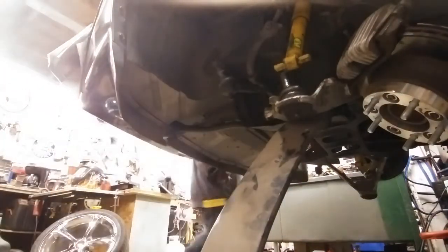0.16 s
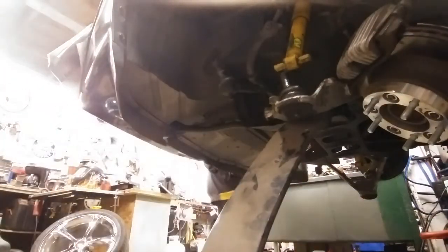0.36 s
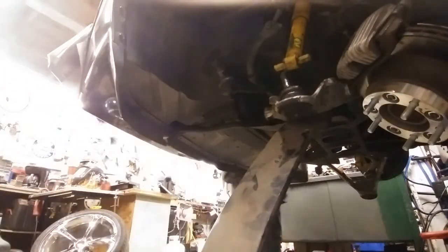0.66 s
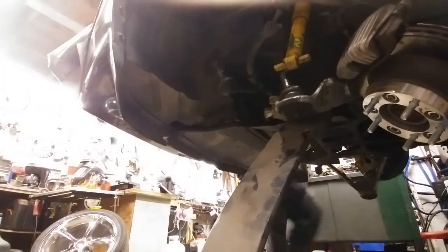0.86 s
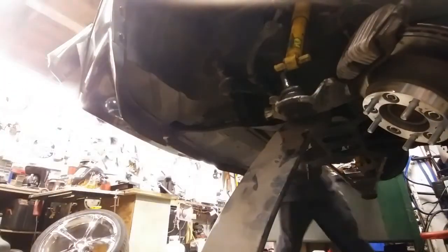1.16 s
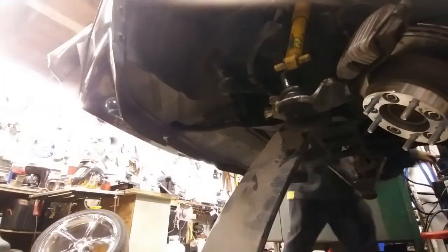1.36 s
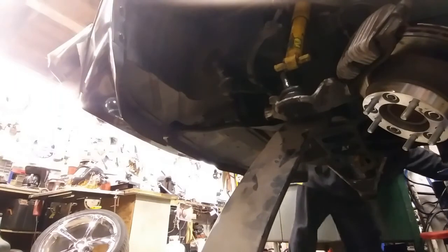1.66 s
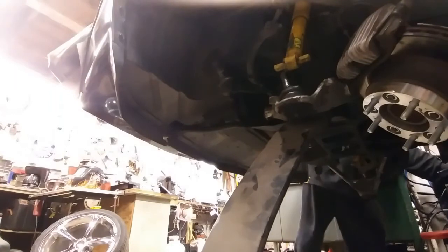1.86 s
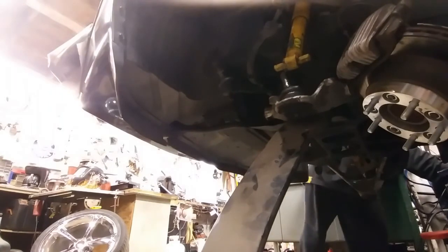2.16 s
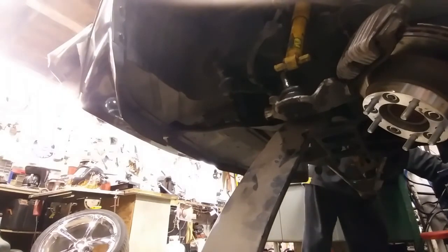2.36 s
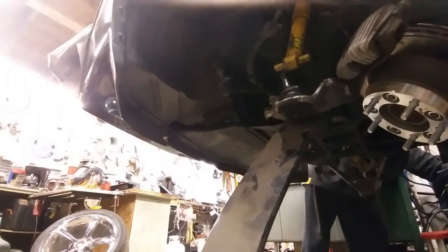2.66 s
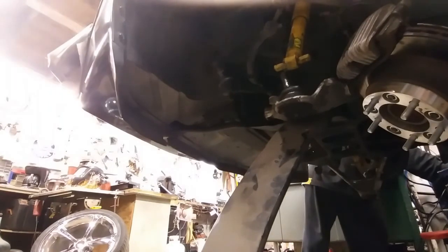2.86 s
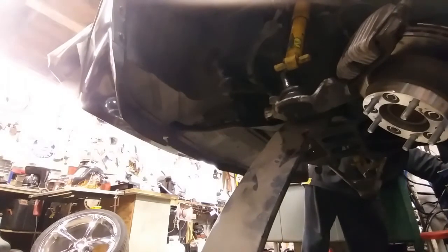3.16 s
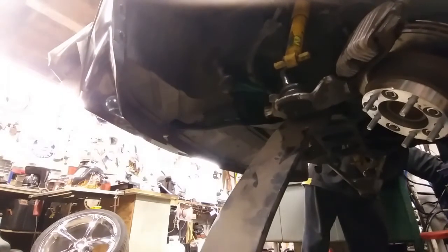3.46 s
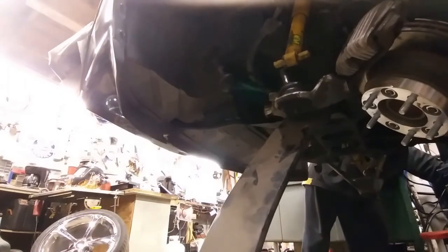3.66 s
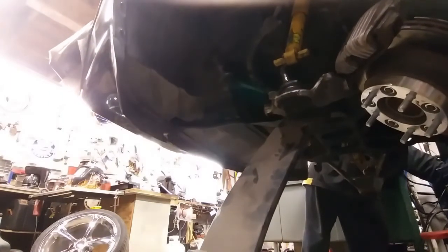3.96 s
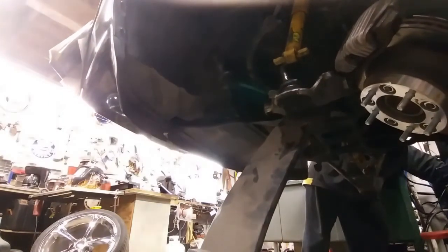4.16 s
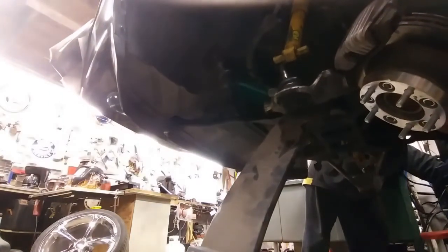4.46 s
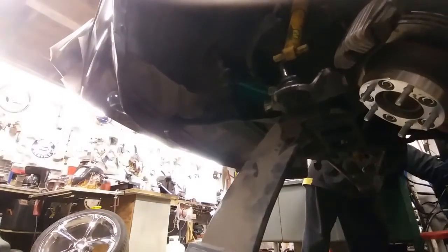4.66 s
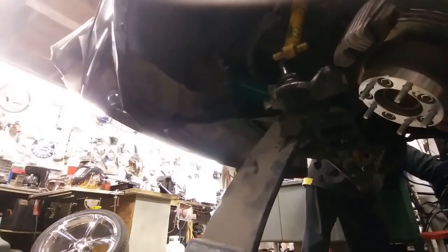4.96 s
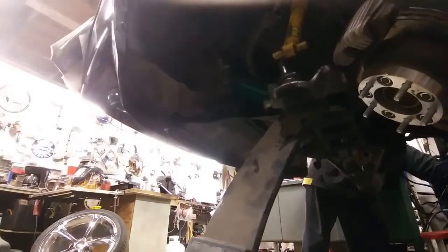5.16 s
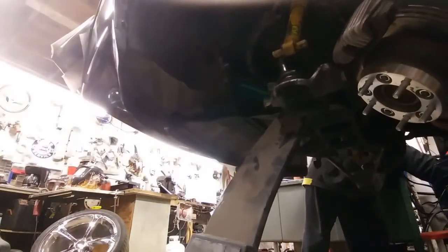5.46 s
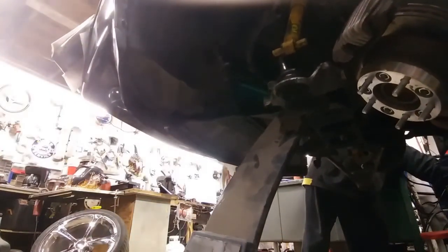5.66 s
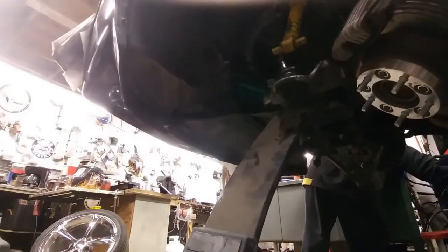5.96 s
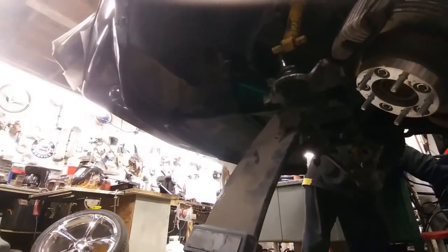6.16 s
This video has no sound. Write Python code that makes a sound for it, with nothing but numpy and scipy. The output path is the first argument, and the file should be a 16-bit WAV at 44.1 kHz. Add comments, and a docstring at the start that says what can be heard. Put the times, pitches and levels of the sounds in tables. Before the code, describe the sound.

Someone shuffles across gritty concrete, bumping things lightly, in a quiet garage. After almost three seconds, paired snaps start a lift motor, which jolts, sweeps upward and settles into a low hum with a harsh metallic gear whine. A bright, bouncing steel clang breaks over it, then a dry crack and hollow panel boom. The motor drones to the end, its pump tone cleaner under load. Near microphone, short room reverberation.

```python
"""Two-post lift in a workshop

Heard from under the car: someone scuffs and bumps along to the column and presses the switch.
The mains motor spins up with a rising whine and drives a nine-tooth hydraulic gear pump, built from
multiples of the shaft speed over hissing oil. The safety latch drops with a steel clang, ringing modes
under a noise crash; the car body booms as it settles on the arms, and the pump turns cleaner and harder."""
import sys
import numpy as np
from scipy import signal
from scipy.fft import rfft, irfft
from scipy.io import wavfile
from scipy.ndimage import uniform_filter1d

SR = 44100
rng = np.random.default_rng(int(sys.argv[2]) if len(sys.argv) > 2 else 0)


def wav_record(signal):
    """Record a signal, one row per channel, as 16-bit PCM in the file named by sys.argv[1]."""
    frames = np.transpose(np.atleast_2d(signal))
    bounded = np.clip(frames, -1, 1)
    # unit amplitude maps onto the largest positive 16-bit level
    quanta = np.round(bounded * 32767).astype(np.int16)
    wavfile.write(sys.argv[1], SR, quanta)


N = 278712
T = np.arange(N) / SR

ROOM_T60 = 0.46   # s
SHAFT_HZ, TEETH = 59.58, 9
SWITCH_ON_S, SPIN_UP_S = 2.911, 0.1   # the motor gathers speed at an even rate

# the safety latch falls on its rack and bounces: [t/s, level/dB]
LATCH_BOUNCES = [(4.8803, -6.5), (4.894, -8.5), (4.912, -16), (4.929, -14)]
# modes of the steel column: [f/Hz, relative level/dB, t60/s]
STEEL_MODES = [(545, -13, .4), (856, -13, .35), (1450, -9, .2), (2172, -6, .45), (2849, -9, .4),
               (2992, -8, .4), (3103, -1, .4), (3268, -8, .35), (3612, -9, .31), (4752, -10, .39),
               (5456, -9, .4), (6197, -8, .42), (6597, -6, .5), (6907, -9, .27), (7598, -4, .55),
               (7632, -7, .4), (8031, 0, .2), (8598, -7, .24), (9121, -6, .24), (9290, -14, .4),
               (9588, -15, .23), (13380, -22, .25), (15353, -13, .45)]


def amp(db):
    """Decibels to gain."""
    return 10 ** (np.asarray(db) / 20)


def unit(x):
    """Scale to rms 1."""
    return x / np.sqrt(np.mean(x ** 2) + 1e-20)


def at_hz(points, hz, axis=1):
    """Read a column of a spectrum on a log-frequency axis."""
    points = np.array(points)
    return np.interp(np.log(np.maximum(hz, 1)), np.log(points[:, 0]), points[:, axis])


def noise(spectrum, axis=1):
    """Noise whose power per Hz follows a spectrum."""
    hz = np.fft.rfftfreq(N, 1 / SR)
    white = rfft(rng.standard_normal(N))
    return irfft(white * amp(at_hz(spectrum, hz, axis=axis)), N) * np.sqrt(SR / 2)


def drift(rate, t=T):
    """Random wander of spread about 1, in straight lines between `rate` knots a second."""
    knots = rng.standard_normal(2048)
    return np.interp(t * rate, np.arange(len(knots)), knots)


def ramp(start, length):
    """An even rise from 0 to 1, in seconds."""
    return np.clip((T - start) / max(length, 1e-3), 0, 1)


def metallic(x, ripple_db, spacing_hz):
    """Countless weak modes and reflections put narrow peaks and dips all along the spectrum; rms 1."""
    hz = np.fft.rfftfreq(N, 1 / SR)
    knots = np.clip(rng.standard_normal(2048), -1.7, 1.7)
    ripple = np.interp(hz / spacing_hz, np.arange(len(knots)), knots)
    return unit(irfft(rfft(x) * amp(ripple_db * ripple), N))


def fade(s, rise, t60, room_db):
    """Envelope of a blow: it swells, dies away and leaves the room ringing."""
    env, start = np.zeros(N), max(int(s * SR), 0)
    age = T[:min(N - start, 2 * SR)]
    late = np.maximum(age - rise, 0)
    direct_power = amp(-120 * late / t60)
    room_power = amp(2 * room_db - 120 * late / ROOM_T60)
    swell = np.minimum(age / max(rise, 1e-4), 1)
    env[start:start + len(age)] = swell * np.sqrt(direct_power + room_power)
    return env


def strike(modes, s, scatter_db):
    """One blow rings every mode, each with a strength and sign of its own."""
    out, start = np.zeros(N), int(s * SR)
    age = T[:min(N - start, SR)]
    for hz, db, t60 in modes:
        level = db + scatter_db * rng.standard_normal() - 60 * age / t60
        out[start:start + len(age)] += rng.choice([-1, 1]) * amp(level) * np.sin(2 * np.pi * hz * age)
    return out


def thud(s, db, hz, octaves, rise, t60, room_db=-14):
    """A blow on a well-damped thing: a dying cluster of dense modes around one pitch."""
    half = 2 ** (max(octaves, 0.05) / 2)
    band = signal.butter(2, [hz / half, min(hz * half, SR / 2 - 1)], "band", fs=SR, output="sos")
    cluster = unit(signal.sosfilt(band, rng.standard_normal(N)))
    return amp(db) * cluster * fade(s, rise, t60, room_db)


def workshop(x, wet_db):
    """Direct sound plus the dense echoes of a cluttered room."""
    age = T[:SR]
    echoes = rng.standard_normal(SR) * amp(-60 * age / ROOM_T60)
    return x + amp(wet_db) * signal.fftconvolve(x, echoes / np.linalg.norm(echoes))[:N]


def room_air(level_db=-57):
    """Steady air of the workshop: noise, strongest in the bass."""
    # spectrum of the air: [f/Hz, relative level/dB]
    air_colour = [(15, -51), (25, -30), (76, -0.5), (276, -11.5), (307, -2), (342, -12.5), (604, -4.5),
                  (672, -10.5), (1060, -12), (1980, -19.5), (2970, -19), (3780, -28), (8270, -18),
                  (9460, -26), (15800, -45)]
    return amp(level_db) * unit(noise(air_colour))


def scuffs(grain_db=0.0, room_db=-14):
    """Soles and clothes scuff: friction on concrete and cloth, coloured by nearby reflections."""
    # strokes: [t/s, level/dB, rise/s, t60/s]
    strokes = [(0, -50, .017, 0.41), (.071, -43.5, 0.012, .38), (.093, -35, 0.049, 0.19),
               (.54, -46.5, 0.063, 0.99), (0.833, -51, 0.0074, 0.46), (1.159, -34, 0.019, 0.54),
               (1.524, -45, .0013, 0.28), (2.055, -53, .01, .18), (2.14, -48, 0.057, .11)]
    # spectrum of the friction: [f/Hz, relative level/dB]
    friction_colour = [(400, 4.5), (1000, -9), (2500, -3.5), (3600, -2.5), (5200, -3), (7000, 4.5),
                       (8500, 5.5), (10200, -14.5), (12500, -22), (15500, -14)]
    power = sum((amp(db) * fade(s, rise, t60, room_db)) ** 2 for s, db, rise, t60 in strokes)
    friction = metallic(noise(friction_colour), ripple_db=6.5, spacing_hz=89.2)
    return np.sqrt(power) * unit(friction * amp(grain_db * drift(220)))


def steps(grain_db=1.5):
    """Boots land on gritty concrete: broad thuds with a rough, flickering level."""
    # footfalls, heel and toe: [t/s, level/dB, centre f/Hz, t60/s]
    footfalls = [(0.049, -46.5, 790, .08), (0.068, -38.5, 820, 0.092), (.105, -46, 1400, 0.3),
                 (.536, -37.5, 487, 0.39), (.72, -56, 290, .22), (1.139, -41.5, 836, 0.95),
                 (1.168, -38, 900, .4), (1.21, -33.5, 850, 0.36), (1.287, -31.5, 580, 0.2)]
    landings = sum(thud(s, db, hz, octaves=2.28, rise=0.0046, t60=t60) for s, db, hz, t60 in footfalls)
    return landings * amp(grain_db * drift(120))


def knocks(grain_db=4.0):
    """Light knocks on tools and on the lift, each at the pitch of the thing that is hit."""
    # knocks: [t/s, level/dB, pitch f/Hz, t60/s]
    light_hits = [(1.171, -31, 2370, 0.3), (1.523, -31.5, 1006, 0.31), (1.72, -54, 446, 0.31),
                  (1.871, -56.5, 720, 0.55), (2.137, -54.5, 935, .3), (2.902, -40.5, 533, 0.19),
                  (3.61, -46.5, 840, 0.71), (5.225, -31.5, 1070, 0.12)]
    hits = sum(thud(s, db, hz, octaves=0.76, rise=0.0015, t60=t60) for s, db, hz, t60 in light_hits)
    return hits * amp(grain_db * drift(120))


def bumps():
    """Padded blows thud on the panels and boom in the car body; softer ones reach only its lowest modes."""
    # blows on the car and the lift:
    # [t/s, boom level/dB, softness cut-off f/Hz, panel thud level/dB, thud rise/s]
    blows = [(.545, -47.5, 200, -46, 0.011), (1.168, -37, 128, -38, 0.013), (1.457, -53, 250, -55.5, .01),
             (2.608, -38, 280, -38.5, 0.014), (2.672, -26, 70, -53, .01), (2.952, -38, 80, -55, .01),
             (3.164, -33.5, 150, -41, 0.0078), (3.196, -36, 107, -47, .01), (4.0, -56, 200, -35.5, 0.04),
             (4.063, -39.5, 300, -35, .014), (4.6, -54, 200, -44, 0.009), (4.923, -38, 300, -39, .005),
             (5.083, -24, 560, -22, .004), (5.251, -28, 70, -55, .01)]
    # modes of the car body: [f/Hz, relative level/dB, t60/s]
    body_modes = [(52, -13, .4), (68, -1, .45), (88, -5, .3), (168, -3, .25), (216, 6, .28), (243, -6, .22)]
    out = np.zeros(N)
    for s, boom_db, soft_hz, thud_db, rise in blows:
        padding = signal.butter(2, soft_hz, fs=SR, output="sos")
        out += amp(boom_db) * signal.sosfilt(padding, strike(body_modes, s, scatter_db=-1.5))
        out += thud(s, thud_db, hz=252, octaves=1.83, rise=rise, t60=0.31)
    return out


def clacks():
    """Switch contacts, latch and arm snap short and bright, and leave the column ringing faintly."""
    # snaps: [t/s, level/dB, rise/s, t60/s, steel ring relative level/dB, room relative level/dB]
    snaps = [(0.711, -41, 0.0017, 0.085, -38, -26), (2.9136, -23.5, .0015, 0.074, -17, -4.5),
             (2.988, -22.5, .004, 0.086, -14, -4), (5.0807, -8.5, 0.00059, 0.024, -26.5, -20.5)]
    # spectrum of a snap: [f/Hz, relative level/dB]
    snap_colour = [(300, -6.5), (1300, -6.5), (3000, -3), (4300, -2), (5400, -7), (7400, 4), (8800, 1.5),
                   (10200, -15.5), (12000, -26), (15500, -27)]
    crack = metallic(noise(snap_colour), ripple_db=5, spacing_hz=70)
    out = np.zeros(N)
    for s, db, rise, t60, ring_db, room_db in snaps:
        ring = amp(ring_db) * strike(STEEL_MODES, s, scatter_db=2)
        out += amp(db) * (crack * fade(s, rise, t60, room_db) + ring)
    return out


def latch(ring_db=-7, t60=0.17):
    """Steel on steel: a dense crash with the column's clear modes ringing through it."""
    # spectrum of the crash: [f/Hz, relative level/dB]
    crash_colour = [(59, -39), (100, -4), (522, -15), (748, -29), (849, -10.5), (1170, -12), (1470, -3.5),
                    (2670, -8), (3030, 2.5), (3440, -8), (6350, -5), (7220, -8), (7850, -2.5),
                    (12000, -25.5), (15800, -28)]
    power = sum((amp(db) * fade(s, 0.00025, t60, room_db=-9)) ** 2 for s, db in LATCH_BOUNCES)
    crash = np.sqrt(power) * metallic(noise(crash_colour), ripple_db=1.5, spacing_hz=27.77)
    s, db = LATCH_BOUNCES[0]   # the first blow sets the column ringing
    return crash + amp(db + ring_db) * strike(STEEL_MODES, s, scatter_db=0.0)


def latch_seat():
    """The latch's last bounce drives it home with a dull thud."""
    return thud(LATCH_BOUNCES[-1][0], db=-21.5, hz=560, octaves=1.8, rise=0.0029, t60=0.37)


def shaft_speed():
    """Share of full speed."""
    return ramp(SWITCH_ON_S, SPIN_UP_S)


def jolt():
    """The starting torque kicks the power unit against its mounting and rattles its cover."""
    mounting = thud(SWITCH_ON_S, db=-32.5, hz=540, octaves=0.29, rise=0.0046, t60=0.73)
    cover = thud(SWITCH_ON_S, db=-35.5, hz=2220, octaves=1.4, rise=0.048, t60=1)
    return mounting + cover


def run_up(housing_db=-3):
    """A rough whine sweeps upward while the rotor gathers speed and leaves the housing's modes ringing."""
    # modes of the motor housing: [f/Hz, width/Hz, relative level/dB]
    housing_modes = [(2370, 30, 14), (2660, 40, 13), (3280, 50, 7), (4450, 60, 0)]
    whine_hz, whine_db = 4410, -31.5   # pitch at full speed, and the loudest level
    full_at, swell_db, fade_db_per_s = 0.56, 57, 450   # share of full speed; dB per unit of that share
    speed = shaft_speed()
    after_run_up = np.clip(T - SWITCH_ON_S - SPIN_UP_S, 0, 1)
    level_db = whine_db - swell_db * np.maximum(full_at - speed, 0) - fade_db_per_s * after_run_up
    low_pass = signal.butter(2, 400, fs=SR, output="sos")
    grit = unit(signal.sosfilt(low_pass, rng.standard_normal(N)))
    tone = np.sin(2 * np.pi * np.cumsum(whine_hz * speed) / SR)
    whine = amp(level_db) * (speed > 0) * unit(1 + 1.1 * grit) * tone
    ringing = np.zeros(N)
    for mode_hz, width_hz, gain_db in housing_modes:
        b, a = signal.iirpeak(mode_hz, mode_hz / width_hz, fs=SR)
        ringing += amp(gain_db) * signal.lfilter(b, a, whine + 1e-18)
    return workshop(whine + amp(housing_db) * ringing, wet_db=2.5)


def pump(turns, load, strong_db=0.57, uneven_db=5, load_scatter_db=4.0, waver_db=2.5, wavers_per_s=5,
         smear=1.4):
    """The gears repeat the same pressure ripple every turn; pipes and column delay each line differently,
    and load shifts the balance."""
    # ordinary multiples of the shaft speed, before the offsets below: [f/Hz, level/dB]
    buzz = [(200, -65), (600, -62.5), (1000, -71.5), (1500, -86), (2200, -68), (3000, -65.5), (3650, -81.5),
            (4500, -67.5), (6100, -95), (7000, -74.5), (8700, -70.5), (10000, -85), (12000, -88),
            (15200, -78)]
    # strong lines, before strong_db: [multiple of shaft speed, level running free/dB, change under load/dB]
    strong_lines = [(6, -57, -3), (9, -50, -1), (22, -53, -3), (23, -70, 12), (24, -65, 4), (25, -48, -4),
                    (27, -59, 3), (34, -60, -7), (36, -57, -8), (38, -66, 7), (44, -52, -2), (45, -50, -5),
                    (46, -60, -2), (54, -63, 3), (66, -60, -10), (68, -72, 12), (74, -64, 6), (90, -55, 0),
                    (92, -58, -13), (98, -54, -8), (99, -60, 9), (100, -50, 3), (101, -59, 4),
                    (103, -65, 5), (106, -56, -11), (107, -54, -2), (108, -53, 0), (109, -59, -3),
                    (117, -62, -4), (119, -62, -6), (126, -67, 15), (144, -58, 3), (173, -83, 17),
                    (259, -81, 15), (261, -82, 19)]
    # load smooths the buzz; multiples of the tooth rate stand out, more so under load
    buzz_load_db, mesh_db, mesh_load_db = -2.5, 4, 8.5
    lift_off_s, lift_off_takes_s = 6.07, 0.3   # the car starts to rise
    sing_hz, sing_width_hz, sing_db = 1285, 88, 6   # and the pump lines near this pitch swell

    orders = np.arange(3, 266)
    mesh = orders % TEETH == 0
    uneven = np.clip(rng.standard_normal(len(orders)), -2, 1) - 0.5
    free_db = at_hz(buzz, orders * SHAFT_HZ) + mesh_db * mesh + uneven_db * uneven
    load_scatter = load_scatter_db * rng.uniform(-1.1, 1, len(orders))
    change_db = np.where(mesh, mesh_load_db, buzz_load_db) + load_scatter
    for order, db, change in strong_lines:
        line = orders == order
        free_db[line], change_db[line] = db + strong_db, change

    # neighbouring lines arrive together and throb once a turn
    phases = np.cumsum(np.cumsum(smear * rng.standard_normal(len(orders))))
    running = np.flatnonzero(turns > 0)
    coarse, out = running[::256], np.zeros(N)   # gains move slowly, so they are set every 256 samples
    angle = (2 * np.pi * (turns[running] % 1)).astype(np.float32)
    sing_by_order = sing_db * np.exp(-((orders * SHAFT_HZ - sing_hz) / sing_width_hz) ** 2)
    rising = ramp(lift_off_s, lift_off_takes_s)[coarse]
    for order, db, change, sing, phase in zip(orders, free_db, change_db, sing_by_order, phases):
        waver = waver_db * drift(wavers_per_s, T[coarse])
        gain = amp(db + change * load[coarse] + sing * rising + waver)
        out[running] += np.interp(running, coarse, gain) * np.sin(int(order) * angle + float(phase))
    return np.sqrt(2) * out


def power_unit(line_db=0, hiss_db=-3.5, wobble=0.00023, tooth_depth=0.19, turn_depth=0.3, shaft_db=-56,
               hum_load_db=1):
    """Motor hum at twice the mains rate, pump buzz, and oil hiss that pulses with the gear teeth."""
    # oil rushing through the pump, before hiss_db:
    # [f/Hz, level per Hz running free/dB, level per Hz under load/dB]
    oil_colour = [(200, -76, -81), (600, -78.5, -80), (1050, -83, -85.5), (1500, -76.5, -78),
                  (1920, -80.5, -84.5), (2880, -81.5, -81.5), (3580, -84, -89.5), (4900, -82.5, -92.5),
                  (6280, -75.5, -78), (6700, -79, -85), (8920, -80, -83), (9830, -94, -100),
                  (11500, -103, -108), (15200, -92.5, -101)]
    # course of the pump's level: [t/s, relative level/dB]
    pump_course = [(3.05, -6.5), (3.35, -0.5), (4.0, 0.5), (4.7, -1.5), (5.4, 0), (6.3, 0)]
    load_from_s, load_takes_s = 4.25, 1.63   # the arms take the weight of the car gradually
    hum_hz, hum_db = 120, -36.5   # running free
    surge_db, surge_rise_s, surge_fall_s = -30, 0.022, 0.028   # the hum overshoots as the rotor locks in
    bite_db, bite_s = 8, 0.031   # the pump is briefly louder as it first bites

    speed, load = shaft_speed(), ramp(load_from_s, load_takes_s)
    locked_s = SWITCH_ON_S + SPIN_UP_S
    since = np.maximum(T - locked_s - surge_rise_s, 0)
    turns = np.cumsum(SHAFT_HZ * speed * (1 + wobble * drift(14))) / SR
    angle = 2 * np.pi * turns

    free_oil, loaded_oil = noise(oil_colour, axis=1), noise(oil_colour, axis=2)
    oil = np.sqrt(1 - load) * free_oil + np.sqrt(load) * loaded_oil
    oil = np.std(oil) * metallic(oil, ripple_db=3, spacing_hz=35)
    oil *= amp(hiss_db) * (1 + tooth_depth * np.sin(TEETH * angle) + turn_depth * np.sin(angle))
    unbalance = amp(shaft_db) * np.sqrt(2) * np.sin(angle)

    surge = amp(surge_db) * np.exp(-since / surge_fall_s)
    hum_level = ramp(locked_s, surge_rise_s) * (amp(hum_db + hum_load_db * load) + surge)
    hum = hum_level * np.sqrt(2) * np.sin(2 * np.pi * hum_hz * T)
    pump_db = np.interp(T, *np.transpose(pump_course)) + bite_db * np.exp(-since / bite_s)
    return hum + speed * amp(pump_db) * (amp(line_db) * pump(turns, load) + oil + unbalance)


def scene():
    """Everything as heard from under the car."""
    person = scuffs() + steps() + knocks()
    lift = bumps() + clacks() + latch() + latch_seat() + jolt() + run_up() + power_unit()
    return (room_air() + person + lift)[None]


def record(dry, ceiling_db=-10, release_db_per_s=200, low_cut_hz=36, top=0.89, cutoff_hz=15900):
    """The microphone drops the deepest bass; a limiter holds the loudest bursts down; peaks are rounded;
    the top is cut."""
    dry = signal.sosfilt(signal.butter(2, low_cut_hz, "high", fs=SR, output="sos"), dry)
    level = 10 * np.log10(np.maximum(uniform_filter1d(dry[0] ** 2, size=90), 1e-12))   # over 2 ms
    release = release_db_per_s * T
    held = np.maximum.accumulate(np.maximum(level - ceiling_db, 0) + release) - release
    limited = dry * uniform_filter1d(amp(-held), size=45)
    rounded = limited / (1 + (limited / top) ** 8) ** (1 / 8)
    return signal.sosfilt(signal.ellip(10, 0.1, 80, cutoff_hz, fs=SR, output="sos"), rounded)


dry = scene()
out = record(dry)
wav_record(out)
```